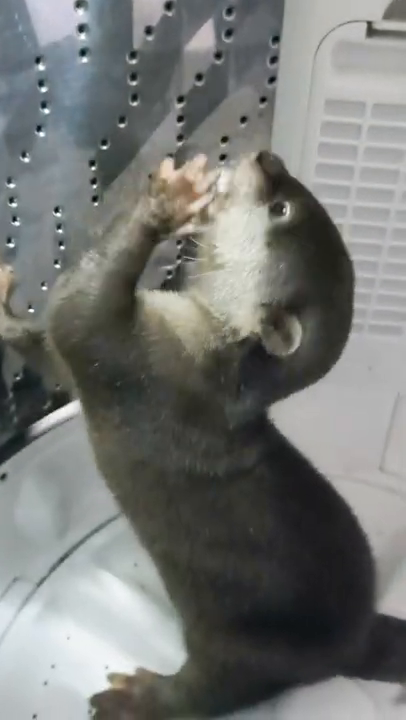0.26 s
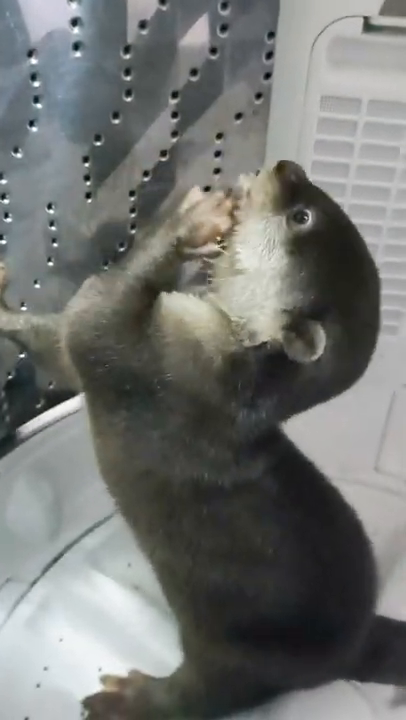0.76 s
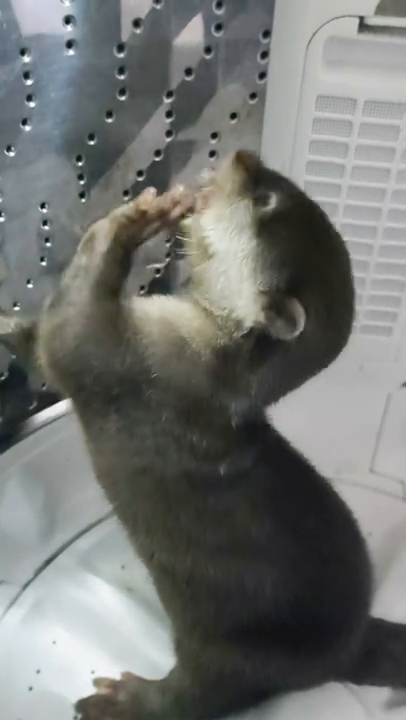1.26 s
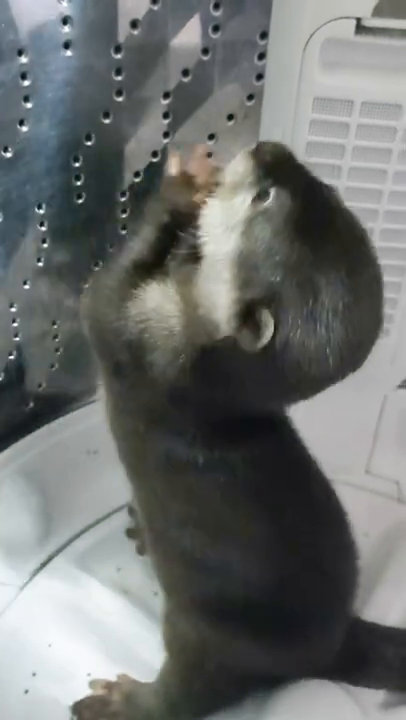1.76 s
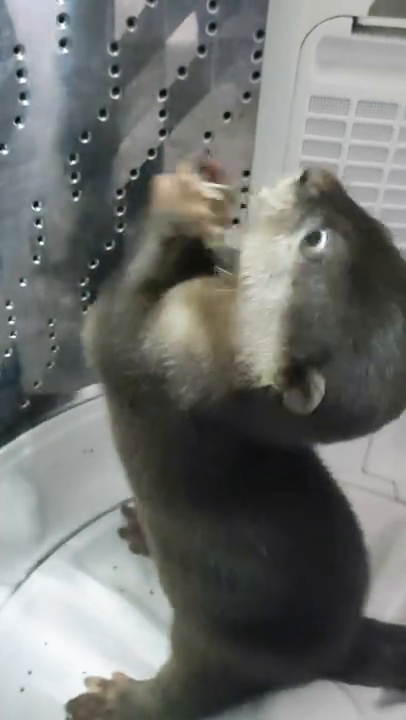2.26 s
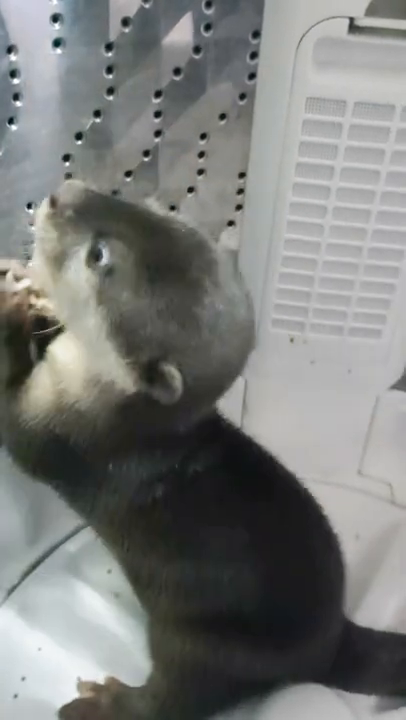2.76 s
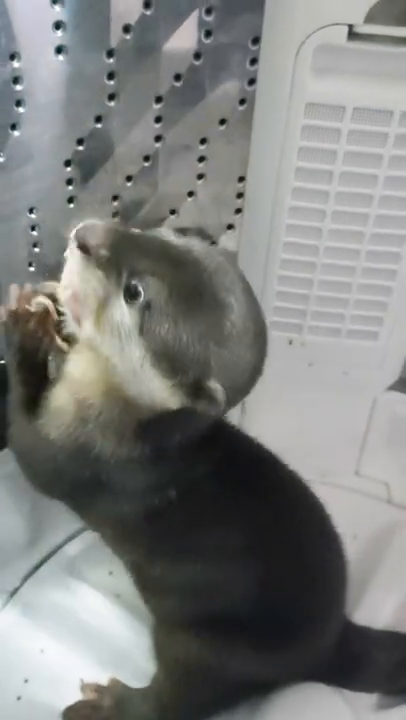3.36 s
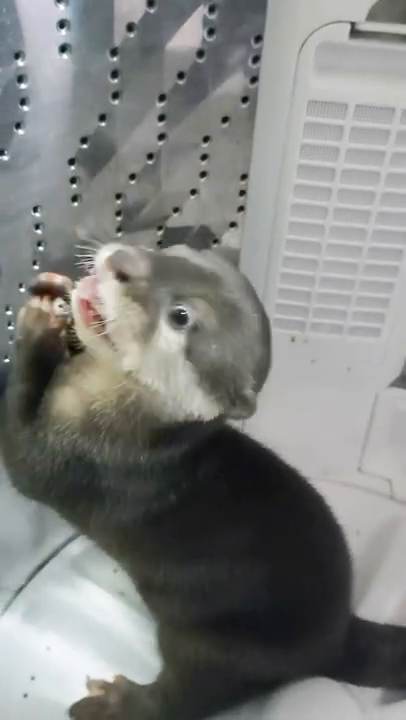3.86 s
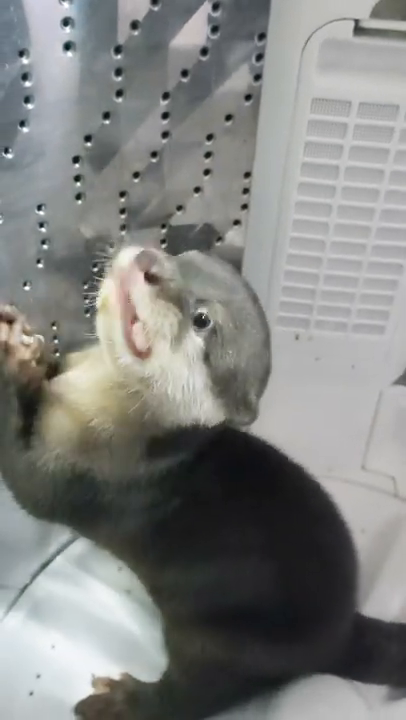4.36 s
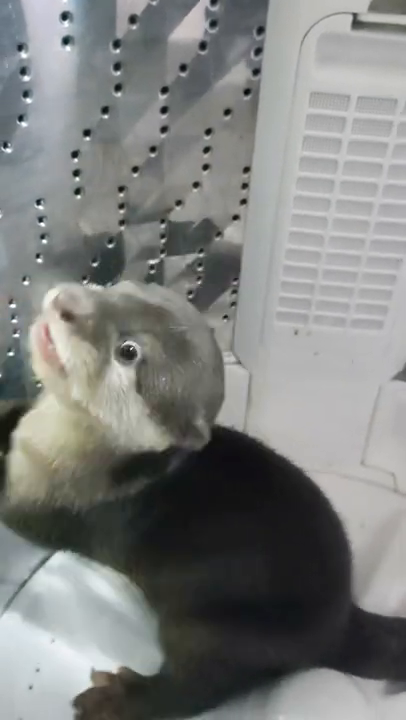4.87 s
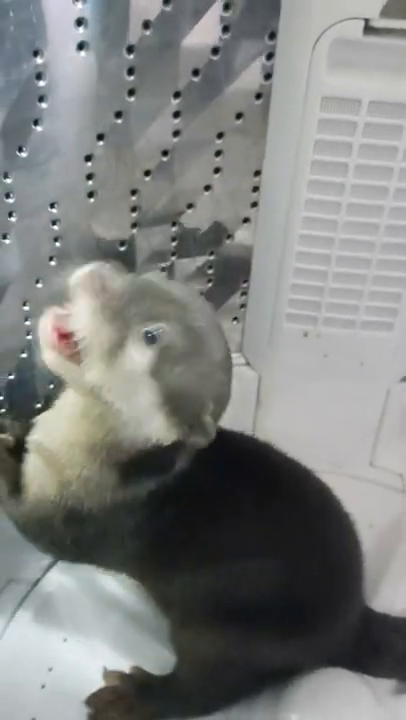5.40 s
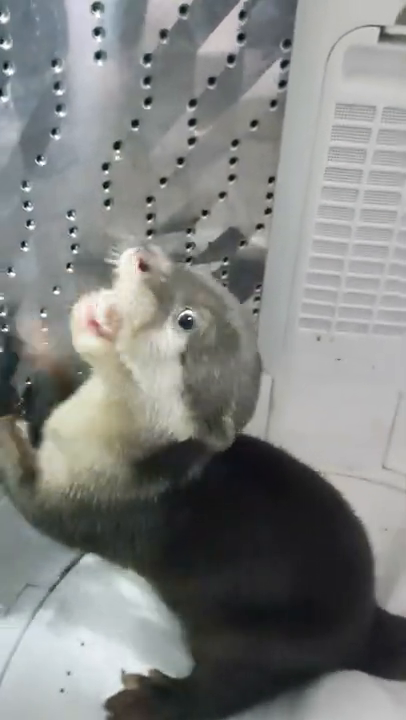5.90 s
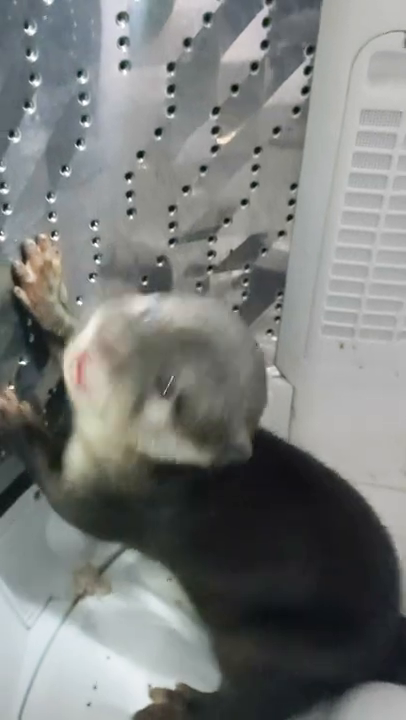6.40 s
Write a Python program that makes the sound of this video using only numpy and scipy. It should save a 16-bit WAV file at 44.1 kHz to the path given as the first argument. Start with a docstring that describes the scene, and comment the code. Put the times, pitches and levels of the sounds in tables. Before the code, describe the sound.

A young otter paws inside a metal washer drum: bright ticks, grainy scrapes, a few ringing knocks and a brief squeak over wavering bass hum.

```python
"""A young otter sits in the steel drum of a washing machine, pawing at the perforated wall and chewing its paws.
At first two brief hums die away and a motor tone slows, over mains hum, low rumble and faint room noise.
Claws and teeth click as coloured bursts, firm blows ring one resonance, and rubs and drags are trains of slips;
near 4.3 s a claw squeaks loudest, as a wavering tone. After 5 s the light touch and stray ticks are fainter,
under the louder slowing motor. Close tones beat throughout, and the drum gives contacts a short, dense ring."""
import sys
import numpy as np
from scipy import signal
from scipy.fft import rfft, irfft
from scipy.io import wavfile
from scipy.ndimage import uniform_filter1d

SR = 44100
rng = np.random.default_rng(int(sys.argv[2]) if len(sys.argv) > 2 else 0)


def master(y):
    """Save y as 16-bit WAV."""
    cut = np.clip(np.atleast_2d(y).T, -1, 1)
    pcm = np.round(cut * 32767)  # scale
    wavfile.write(sys.argv[1], SR, pcm.astype(np.int16))


N = 292824
TIME = np.arange(N) / SR  # s
FAINTER_FROM_S, FAINTER_DB = 5.05, -4  # from here the light touch and stray ticks are fainter

# air modes of the drum: resonance_hz, width_hz, lift_db
DRUM_MODES = [(297.5, 30.4, 8.5), (402.4, 28, 8.5), (460.4, 62, 10.5), (569, 20, 9.5), (751, 39, 6.5),
              (976, 10.5, 9.5), (1228, 17, 9), (1520, 18, -2), (2600, 1200, 2)]


def undb(db):
    """Amplitude ratio of a level: 20 dB to each factor of ten."""
    return 10 ** (np.asarray(db) / 20)


def level(x, db):
    """Root-mean-square scaling to a given level in dB."""
    return x * undb(db) / np.sqrt(np.mean(x ** 2))


def curves(table):
    """Linear interpolation of a timed table's columns at every sample."""
    s, *columns = np.transpose(table)
    return [np.interp(TIME, s, column) for column in columns]


def colour(points, hz):
    """Spectral envelope: gain interpolated in dB along a log-frequency axis."""
    f, db = np.transpose(points)
    return undb(np.interp(np.log(hz + 1), np.log(f), db))


def lift(modes, hz):
    """Modal resonance: each mode raises a narrow band, and the lifts add in dB."""
    return undb(sum(db / (1 + (2 * (hz - f) / width) ** 2) for f, width, db in modes))


def shape(x, points, modes=DRUM_MODES):
    """Minimum-phase filtering: folding the cepstrum makes the outline and resonances causal."""
    size = x.shape[-1]
    hz = np.fft.rfftfreq(size, 1 / SR)
    cepstrum = irfft(np.log(colour(points, hz) * lift(modes, hz)), size)
    cepstrum[1:size // 2] *= 2
    cepstrum[size // 2 + 1:] = 0
    response = np.exp(rfft(cepstrum))
    return irfft(rfft(x) * response, size)


def resonate(x, hz, width):
    """Cascaded resonance: two equal peak filters in series give steep skirts."""
    b, a = signal.iirpeak(hz, hz / width, fs=SR)
    once = signal.lfilter(b, a, x)
    return signal.lfilter(b, a, once)


def walk(rate):
    """Low-pass random fluctuation: twice-smoothed noise steps with a spread near 1."""
    k = int(SR / rate)
    steps = np.repeat(rng.standard_normal(N // k + 1), k)
    smooth = uniform_filter1d(uniform_filter1d(steps, k), k)
    return np.sqrt(2) * smooth[:N]


def add(out, s, x):
    """Linear superposition of x on out from time s."""
    start = max(int(s * SR), 0)
    out[:, start:start + x.shape[-1]] += x[..., :N - start]


def drum_echo(t60=0.057, size=8192):
    """Reverberation: a crack alike at both ports, then dense wall reflections; near unit energy."""
    direct, contact_s = 0.094, 0.00043  # energy share of the crack, its decay time
    late_db, late_t60 = -25, 0.11  # a weaker, slower tail; t60 in s
    t = np.arange(size) / SR
    crack = rng.standard_normal(size) * np.exp(-t / contact_s)
    fade = undb(-60 * t / t60) + undb(late_db - 60 * t / late_t60)
    wall = rng.standard_normal((2, size)) * fade * (1 - np.exp(-t / contact_s))
    mix = np.sqrt(direct) * level(crack, 0) + np.sqrt(1 - direct) * level(wall, 0)
    return mix / np.sqrt(size)


def slips(rate, spread_db):
    """Random impulse train: countless tiny slips of uneven size and either sign, smeared by the drum."""
    happens = rng.random(N) < rate / SR  # rate in slips per second
    sizes = undb(spread_db * np.minimum(rng.exponential(size=N), 3.55))  # capped
    train = happens * sizes * rng.choice([-1, 1], N)
    return signal.fftconvolve(train[None], drum_echo(), axes=1)[:, :N]


def contact(db, tilt_db):
    """Impact excitation: hardness tilts the spectrum; the varying place favours some resonances."""
    # burst of a click: frequency_hz, gain_db
    click_colour = [(150, -18), (600, -9), (1500, -10), (3000, -4), (6000, 2), (9800, -4.5), (12500, 1),
                    (16000, -11)]
    # resonances that claws and teeth set off: resonance_hz, width_hz, lift_db
    contact_modes = [(1140, 500, 2), (2300, 290, 0), (3840, 1560, 3.5), (4950, 400, 1), (6700, 246, 1.5),
                     (8350, 2000, 3.5), (10700, 310, 0), (13000, 1500, -4)]
    tilt_from_hz, tilt_pivot_hz = 1500, 6350  # tilt in dB per octave above the first, about the second
    place_hz, place_spread = 90, 0.66  # shift of each resonance, relative spread of its lift
    outline = []
    for hz, base in click_colour:
        octaves = np.log2(max(hz, tilt_from_hz) / tilt_pivot_hz)
        outline.append((hz, base + db + tilt_db * octaves))
    chance = rng.standard_normal((len(contact_modes), 2))
    modes = [(hz + place_hz * a, width, gain * (1 + place_spread * b))
             for (hz, width, gain), (a, b) in zip(contact_modes, chance)]
    return shape(drum_echo(), outline, DRUM_MODES + modes)


def room():
    """Diffuse-field coherence: air noise from all sides is alike at both ports only in the bass."""
    # colour of the air noise: frequency_hz, gain_db
    room_outline = [(100, -2.5), (200, 0), (300, 5), (430, -2.5), (620, -3.5), (800, -1.5), (1200, -10),
                    (2400, -7), (3300, -13.5), (6000, -16.5), (9500, -28.5), (13000, -26.5), (16000, -56)]
    # level of the air noise: time_s, rms_db
    room_level = [(0, -31), (1.2, -34.5), (4.8, -33), (5.2, -35.5), (6.64, -34)]
    alike = np.sinc(np.fft.rfftfreq(N, 1 / SR) / 520)  # coherence first reaches zero at 520 Hz
    noise = rfft(rng.standard_normal((2, N)))
    mid, side = irfft(noise * np.sqrt([1 + alike, 1 - alike]), N)
    ports = np.array([mid + side, mid - side])
    return level(shape(ports, room_outline), 0) * undb(curves(room_level)[0])


def rumble():
    """Resonant filtering: noise fills the drum's lowest resonance, equally at both ports."""
    # colour of the rumble: frequency_hz, gain_db
    rumble_outline = [(20, -44), (37, -34), (48, -1.5), (53, -10), (66, 4), (80, 1), (100, 8.5), (112, 13),
                      (121, -13.5), (136, -11), (160, -15.5), (200, -44), (400, -59)]
    return level(shape(rng.standard_normal(N), rumble_outline), -22.5)  # rms dB


def hum():
    """Beating: sines close in pitch throb against the mains tone as they drift in and out of step."""
    # a nearly steady motor heard through the drum: time_s, pitch_hz, rms_db
    motor = [(0.0, 94.37, -27.1), (0.5, 93.86, -28.5), (1.2, 93.71, -34.9), (2.3, 93.84, -15.2),
             (2.8, 93.59, -26.5), (3.7, 94.02, -18.0), (4.2, 94.98, -39.3), (5.5, 93.28, -35.2),
             (6.64, 94.27, -26.1)]
    # a second motor that twice swells while it slows: time_s, pitch_hz, rms_db
    drone = [(0.0, 112.84, -23.9), (0.25, 108.58, -15.4), (0.6, 109.66, -32.4), (2.4, 109.46, -39.8),
             (4.6, 111.0, -34.0), (4.95, 111.76, -17.9), (5.25, 110.05, -13.6), (5.8, 107.83, -11.9),
             (6.1, 107.39, -16.6), (6.64, 107.34, -19.6)]
    # a lower hum that soon dies away: time_s, pitch_hz, rms_db
    low_hum = [(0, 80.5, -22), (.4, 80.95, -19), (.6, 82.4, -19.5), (0.801, 83, -75)]
    # a higher hum that soon dies away: time_s, pitch_hz, rms_db
    high_hum = [(0, 143.2, -40), (.3, 134.4, -30), (.6, 131.3, -29.5), (1, 137, -44), (1.5, 138.8, -42),
                (2.2, 144, -66)]
    mains_hz, mains_db = 100.03, -21.5  # rms dB
    out = np.sqrt(2) * undb(mains_db) * np.sin(2 * np.pi * mains_hz * TIME)
    for table in (motor, drone, low_hum, high_hum):
        hz, db = curves(table)
        phase = 2 * np.pi * np.cumsum(hz) / SR
        out = out + np.sqrt(2) * undb(db) * np.sin(phase)
    return out


def bumps():
    """Single-mode excitation: the body's soft blow swells one low mode, which dies quickly."""
    # the body bumps the drum: start_s, pitch_hz, rise_s, peak_db
    bump_table = [(0.491, 89.8, 0.021, 1.5), (4.868, 303, 0.0051, -16), (5.577, 307, 0.008, -20.5)]
    out, t = np.zeros((2, N)), TIME[:SR // 2]
    for s, hz, rise_s, db in bump_table:
        swell = (t / rise_s * np.exp(1 - t / rise_s)) ** 2
        add(out, s, undb(db) * swell * np.sin(2 * np.pi * hz * t))
    return out


def stray_ticks():
    """Random point process: faint contacts at uneven gaps, each of its own hardness."""
    count, ticks_per_s = 80, 5.1  # more ticks than fit; those past the end are skipped
    tick_db, tilt_db, tilt_spread_db = -10, 6.5, 2.1  # relative strength; tilts in dB per octave
    out = np.zeros((2, N))
    times = np.cumsum(rng.gamma(2, .5, count)) / ticks_per_s
    for s, chance in zip(times, rng.standard_normal(count)):
        if s < TIME[-1]:
            db = tick_db + FAINTER_DB * (s > FAINTER_FROM_S)
            add(out, s, contact(db, tilt_db + tilt_spread_db * chance))
    return out


def pressure():
    """Power addition of contact forces: strokes rise, hold and let go over a light touch."""
    # strokes of a paw along the wall, levels relative: start_s, length_s, pad_rub_db, claw_scratch_db
    strokes = [(.36, 0.2, -34.5, -48.5), (0.771, 0.052, -35, -55), (0.939, 0.13, -35.5, -41),
               (1.283, 0.11, -39, -40.5), (1.437, 0.03, -46, -44), (1.748, 0.078, -34, -44),
               (1.884, 0.043, -51, -35.5), (2.078, 0.11, -35, -39), (2.344, 0.12, -41, -41.5),
               (2.435, 0.046, -35.5, -51), (2.569, 0.055, -61, -41), (2.743, 0.066, -43, -36),
               (2.947, .05, -34.5, -39), (3.084, 0.077, -32.5, -44), (3.27, 0.2, -39.5, -40.5),
               (3.49, 0.37, -39.5, -44.5), (3.705, 0.064, -30.5, -54), (3.878, 0.057, -38.5, -30.5),
               (3.997, 0.15, -35.5, -45), (4.16, 0.094, -46, -33.5), (4.322, 0.098, -38.5, -46),
               (4.504, 0.056, -42, -56), (4.668, 0.2, -41.5, -43), (4.86, 0.084, -30.5, -44),
               (5.206, .06, -38.5, -41), (5.374, 0.056, -49, -40), (5.65, 0.31, -44, -49),
               (6.01, 0.051, -37.5, -44), (6.437, 0.11, -34.5, -39)]
    attack_s, release_s = 0.012, 0.026
    fur_db, touch_db = -48.5, -46  # between strokes: fur rustles, claws rest lightly on the steel
    resting = undb(FAINTER_DB * (TIME > FAINTER_FROM_S))
    power = (undb([[fur_db], [touch_db]]) * resting) ** 2
    for s, length_s, pad_db, claw_db in strokes:
        t = TIME - s
        rise = np.clip(t / attack_s, 0, 1)
        release = np.exp(-np.maximum(t - length_s, 0) / release_s)
        power = power + (undb([[pad_db], [claw_db]]) * rise * release) ** 2
    return np.sqrt(power)


def rubbing():
    """Friction noise: soft pads give a dull rub, claws a grainy scratch, their tips a fine crackle."""
    # dull rub of the pads: frequency_hz, gain_db
    rub_colour = [(300, -8), (700, -4), (1200, -3), (1700, -1.5), (2400, -1.5), (3100, -8), (4500, -14.5),
                  (7000, -15), (16000, -41)]
    # grainy scratch of the claws: frequency_hz, gain_db
    scratch_colour = [(1500, -50), (3200, 4), (5200, 4), (7800, 2), (9800, -3.5), (16000, -23)]
    # fine crackle of the claw tips: frequency_hz, gain_db
    tip_colour = [(4000, -27), (7000, -7), (9800, -7), (12500, 3), (14500, -1.5), (16000, -1.5)]
    on_pads, on_claws = pressure()
    # rms dB before the pressure is applied
    pads = level(shape(slips(rate=1100, spread_db=4.5), rub_colour), 0)
    claws = level(shape(slips(rate=580, spread_db=8.5), scratch_colour), -3)
    tips = level(shape(slips(rate=340, spread_db=5.0), tip_colour), -4.5)
    return pads * on_pads + (claws + tips) * on_claws


def drags():
    """Resonant friction: a run of slips swells quickly and fades in one broad resonance."""
    # a paw drags over the holes: start_s, length_s, resonance_hz, width_hz, rms_db
    drag_table = [(0.481, 0.17, 4640, 3888, -32.5), (0.367, 0.37, 2650, 648.1, -43),
                  (0.954, 0.034, 5200, 5000, -28), (1.45, 0.074, 2300, 500, -41.5),
                  (2.11, 0.033, 1680, 1100, -33.5), (3.1, 0.074, 1300, 900, -44),
                  (3.4, 0.054, 1600, 700, -45), (4.876, 0.059, 2220, 800, -34),
                  (5.213, 0.04, 4000, 2530, -37), (6.02, 0.095, 1290, 898.1, -41)]
    out, grain = np.zeros((2, N)), slips(rate=500, spread_db=5.0)
    for s, length_s, hz, width, db in drag_table:
        start, size = int(s * SR), int(length_s * SR)
        band = resonate(grain[:, start:start + size], hz, width)
        swell = np.sin(np.pi * np.sqrt(np.arange(size) / size))
        add(out, s, level(band * swell, db))
    return out


def squeaks():
    """Stick-slip oscillation: fast slipping makes a short unsteady tone that the wall smears."""
    # a claw skids on the steel: start_s, pitch_hz, length_s, peak_db
    squeak_table = [(.170, 6230, 0.0081, -27), (4.3391, 6080, 0.014, -7), (4.456, 6240, 0.0014, -22)]
    waver, echo_db = 0.035, -6  # relative pitch spread; peak of the echo against the tone
    out = np.zeros((2, N))
    for s, hz, length_s, db in squeak_table:
        size = int(length_s * SR)
        pitch = hz * (1 + waver * walk(3000)[:size])
        tone = np.sin(2 * np.pi * np.cumsum(pitch) / SR) * np.hanning(size)
        ring = signal.fftconvolve(tone[None], drum_echo(), axes=1)
        ring *= undb(echo_db) / np.abs(ring).max()
        ring[:, :size] += tone
        add(out, s, undb(db) * ring / np.abs(ring).max())
    return out


def knocks():
    """Local plate resonance: a firm blow rings one patch of the steel wall briefly."""
    # firm blows: start_s, resonance_hz, width_hz, energy_db
    knock_table = [(.955, 2240, 493, 8), (0.9567, 5540, 1015, 10), (3.317, 1000, 696, 3),
                   (3.319, 2470, 600, 3), (3.320, 5400, 400, -1), (4.0328, 1110, 504, -6),
                   (4.322, 2740, 900, -5), (4.344, 4200, 400, 1.5), (4.868, 437, 460, 7),
                   (5.003, 4080, 1300, 2.5), (5.578, 400, 350, 2.5), (6.558, 2930, 810, -1.5),
                   (6.5861, 2450, 1080, 4.5)]
    out = np.zeros((2, N))
    for s, hz, width, db in knock_table:
        ring = resonate(drum_echo(t60=0.062), hz, width)
        add(out, s, level(ring, db) / np.sqrt(ring.shape[1]))  # mean square to energy
    return out


def clicks():
    """Impact hardness: hard tips of claws and teeth sound bright, blunt ones dull."""
    # sharp contacts, strength relative: start_s, strength_db, tilt_db_per_octave
    click_table = [(.106, -3.5, 10.5), (0.172, 0.5, -2), (0.275, 1.5, 13.5), (0.5446, 4.5, 4),
                   (0.6155, -5.5, 12), (0.6688, -2, 3), (0.73, -10, 10), (0.9103, -5.5, 7),
                   (0.9562, 15, -1), (1.007, 2.5, 16.5), (1.357, 0, 7), (1.379, -6, 9), (1.4254, -2, 4.5),
                   (1.515, -4.5, -5), (1.5751, 3.5, 6.5), (1.76, -5.5, 9), (1.768, 0.5, 4), (1.822, -1, 11),
                   (1.919, -6.5, 0), (1.9692, 4, -0.5), (2.117, 6.5, -3), (2.1713, 0.5, 0), (2.1815, 0, 16),
                   (2.2412, -2.5, 2), (2.302, -2, 5.5), (2.3458, -1, 2.5), (2.387, 1.5, 8), (2.399, 1, 10),
                   (2.4064, 1.5, 12), (2.465, -10, 2), (2.7452, -2, 0.5), (2.915, -10, 8),
                   (2.9763, -3.5, 13), (3.0681, 3.5, 9.5), (3.1003, -2.5, 0), (3.1576, -4, 13),
                   (3.2604, -3.5, 9.5), (3.32, 11.5, -3), (3.366, -7, 11), (3.4154, 9, -3.5),
                   (3.441, 2, -3), (3.721, 6, 6), (3.731, -1, 0), (3.802, 1.5, 14), (3.8922, -1.5, -6),
                   (3.921, -10, -10), (4.2, 14.5, 1), (4.2202, -2.5, -8), (4.2397, 7, 0), (4.322, -3, -5),
                   (4.3438, 9, -5.5), (4.435, -5, 13), (4.454, 2, 6.5), (4.5236, -3, 5), (4.5376, -4, 11),
                   (4.5675, 3, -2), (4.7761, -0.5, -7.5), (4.868, -5.5, -12), (5.0037, 10, 4.5),
                   (5.198, -13, 14), (5.253, -4, -7), (5.441, -8.5, -6.5), (5.5728, 3.5, 0.5),
                   (5.856, 2.5, -3.5), (6.1858, 0.5, 8), (6.2485, 6, -0.5), (6.5587, -3, 0),
                   (6.5859, 4, -1.5)]
    out = np.zeros((2, N))
    for s, db, tilt_db in click_table:
        add(out, s, contact(db - 3.5, tilt_db))
    return out


def scene():
    """Superposition of everything that sounds inside the drum."""
    background = room() + rumble() + hum()
    body_and_paws = bumps() + stray_ticks() + rubbing() + drags()
    return background + body_and_paws + squeaks() + knocks() + clicks()


def record(dry):
    """Frequency-dependent balance and band limit: of two ports the right has more bass; the top is cut."""
    # level balance of the ports: frequency_hz, left_minus_right_db
    balance = [(60, -1.5), (110, -5.5), (200, -2), (380, -1), (700, -2.5), (1300, 3), (2400, 2), (5000, 2),
               (8000, 1), (10000, -3.5), (15000, -2.5)]
    lean = np.sqrt(colour(balance, np.fft.rfftfreq(N, 1 / SR)))  # half the difference to each port
    ports = irfft(rfft(dry) * np.array([lean, 1 / lean]), N)
    top_cut = signal.ellip(8, .2, 70, 15750, fs=SR, output="sos")  # ripple dB, stop-band dB, edge Hz
    return signal.sosfilt(top_cut, np.clip(ports, -1, 1))


dry = scene()
out = record(dry)
master(out)
```